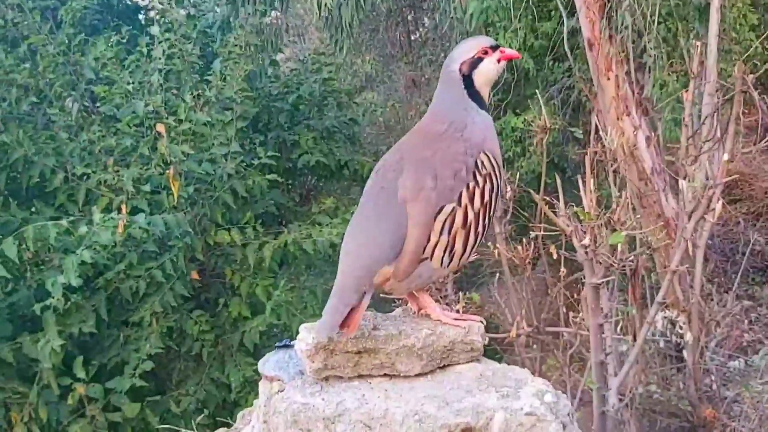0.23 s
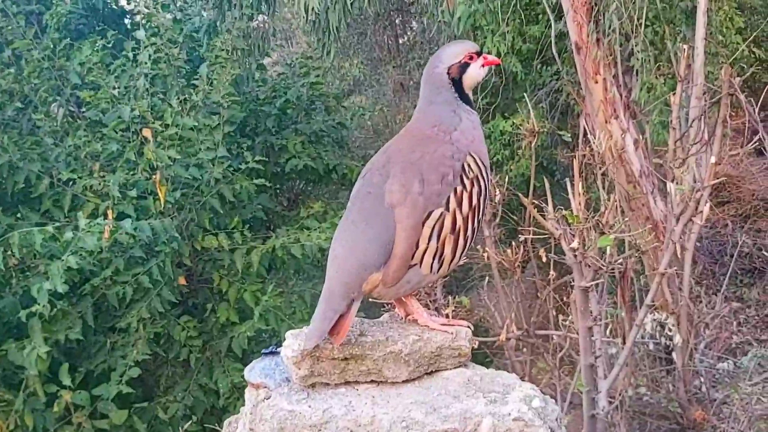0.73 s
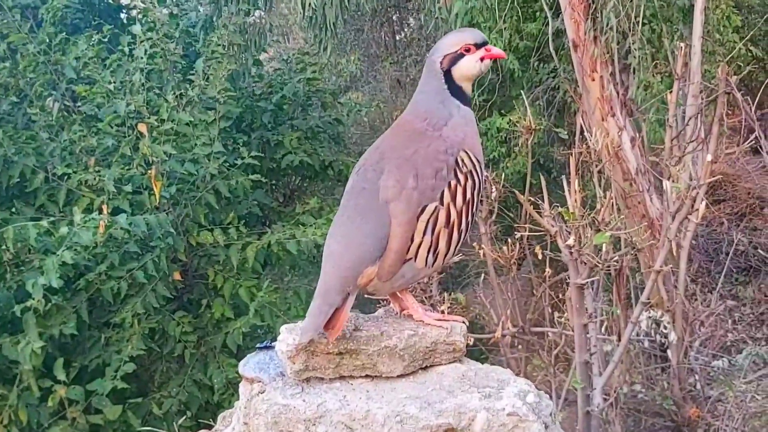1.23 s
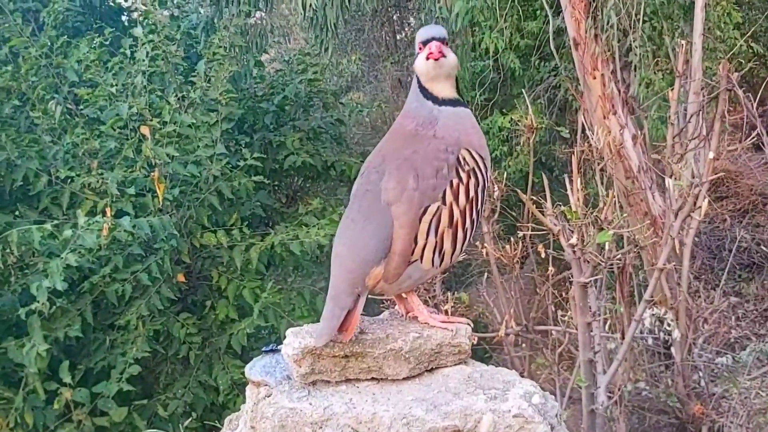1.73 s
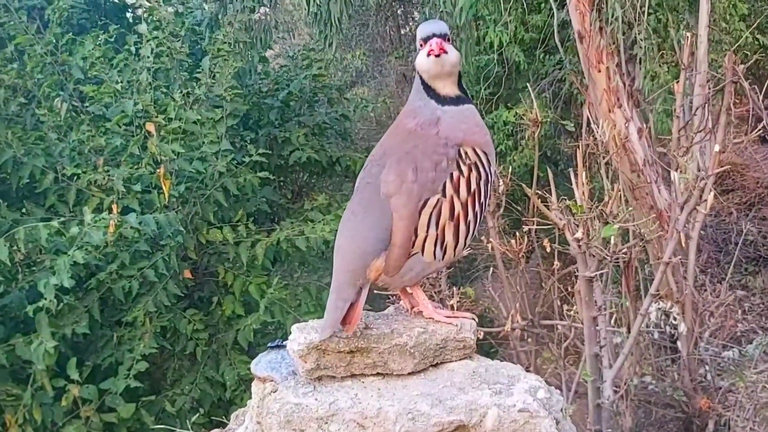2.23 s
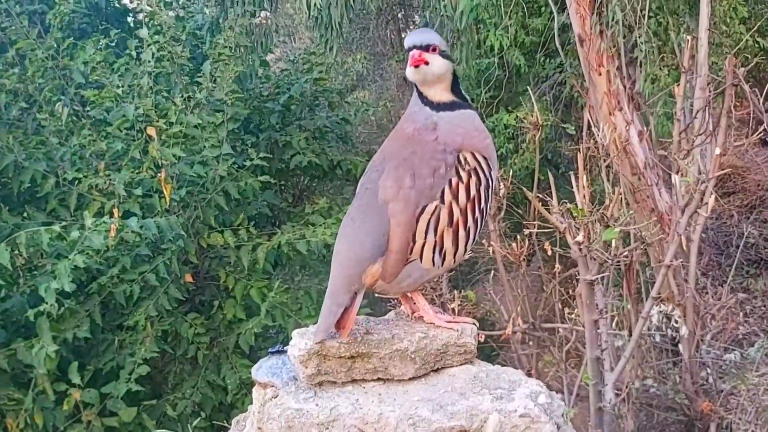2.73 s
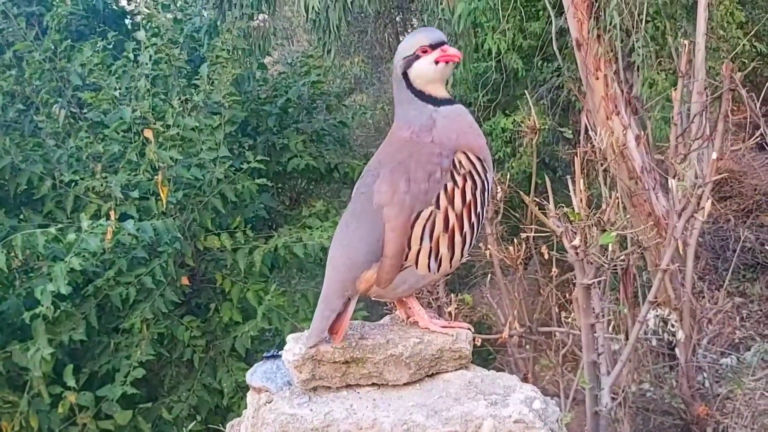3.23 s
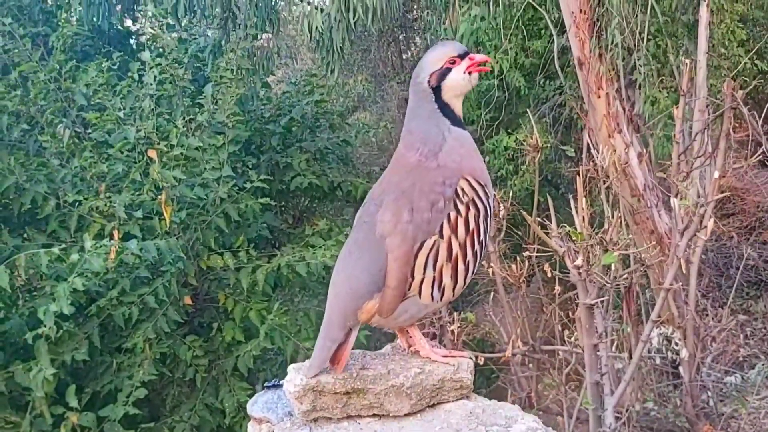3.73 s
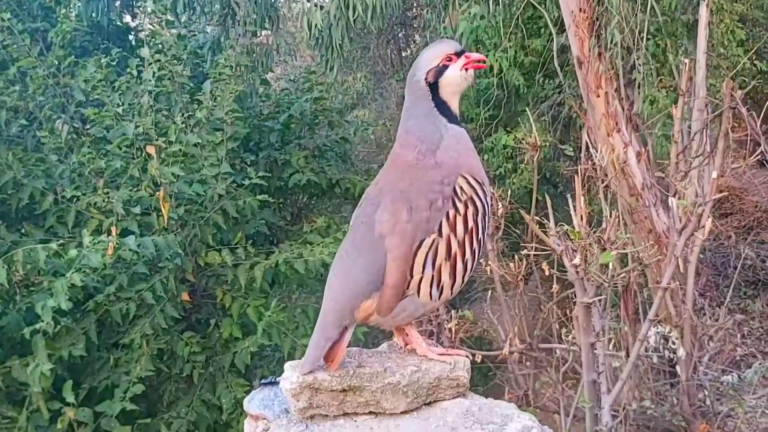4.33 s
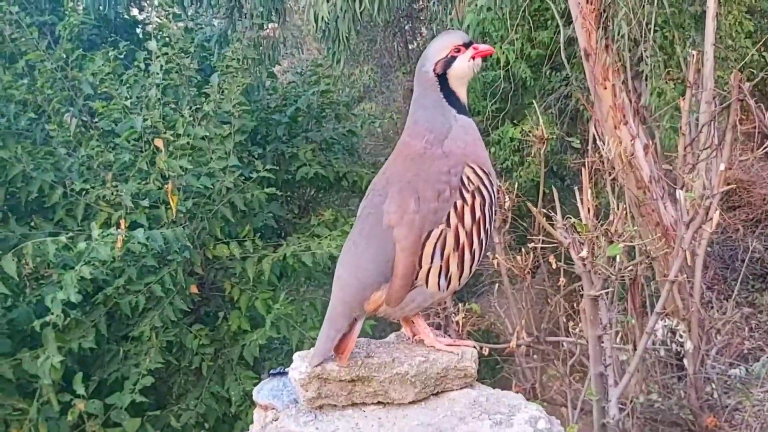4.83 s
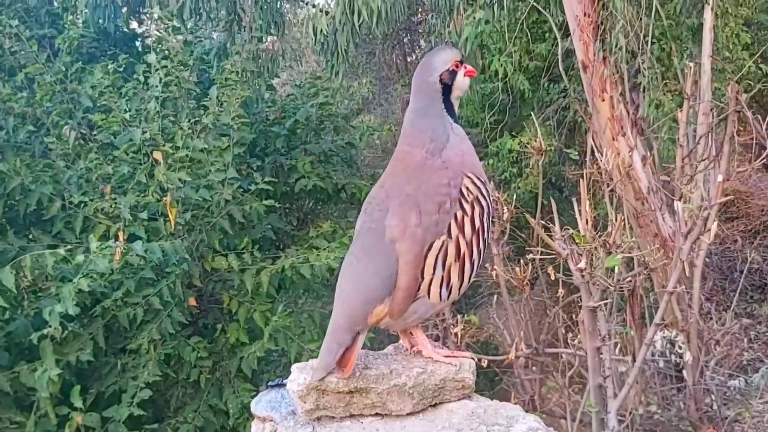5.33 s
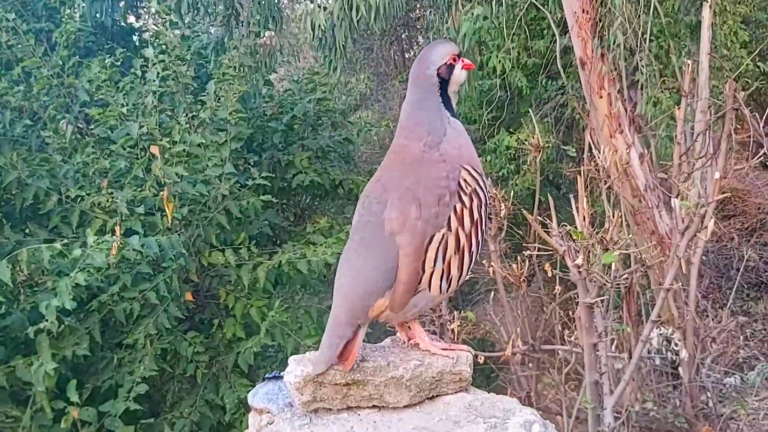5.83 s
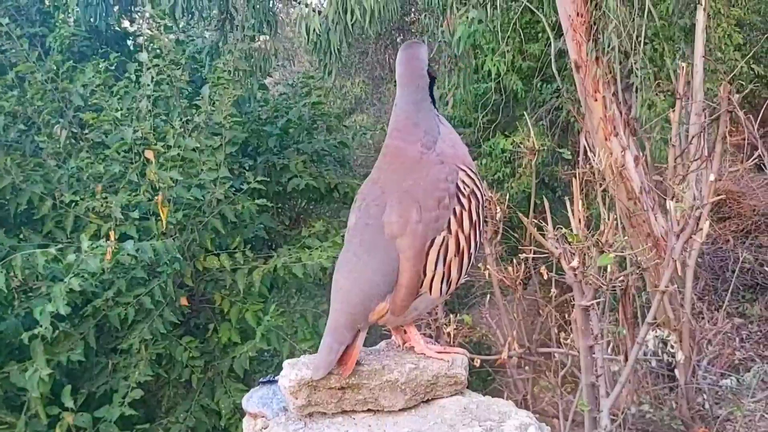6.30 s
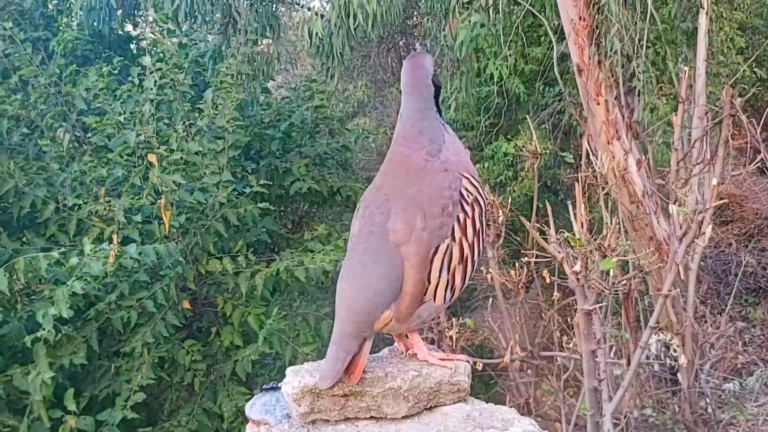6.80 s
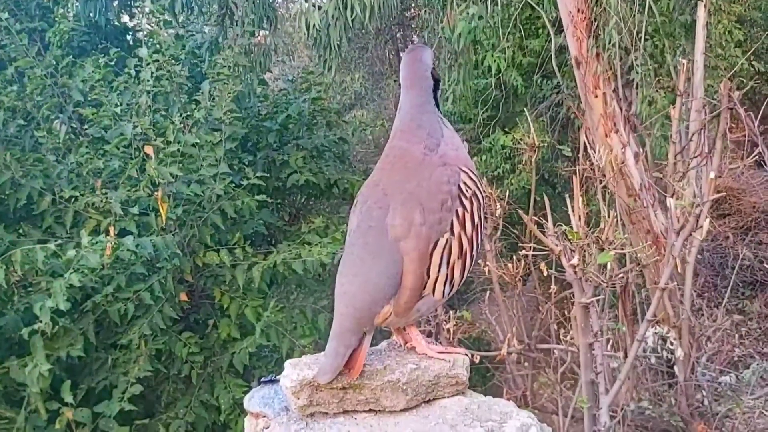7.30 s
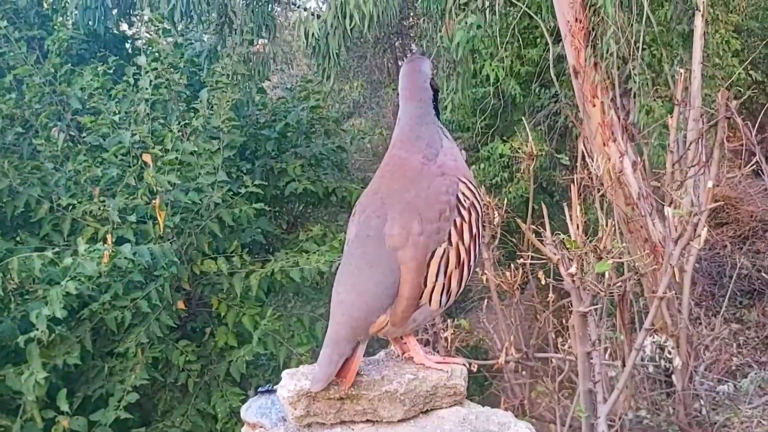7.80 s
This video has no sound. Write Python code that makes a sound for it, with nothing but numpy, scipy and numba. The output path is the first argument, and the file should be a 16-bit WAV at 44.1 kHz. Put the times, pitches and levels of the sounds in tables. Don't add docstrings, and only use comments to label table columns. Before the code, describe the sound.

Outdoors among bushes, a phone close to a game bird catches its hoarse cackling. Spaced, clipped clucks come first, then strong nasal chuks and shorter notes pack together, louder and more urgent, in rolling groups of three. Slight leafy echo follows each note. A far rival and other birds answer very faintly. The call cuts off near the end, leaving soft air and a low bump.

```python
import sys
import numpy as np
from scipy import signal
from scipy.io import wavfile
from scipy.ndimage import uniform_filter1d, minimum_filter1d
from numba import njit

SR = 44100
rng = np.random.default_rng(int(sys.argv[2]) if len(sys.argv) > 2 else 0)


def volts(x):
    e = np.asarray(x, float) / 20
    return 10 ** e


def to_wav(s):
    ch = np.atleast_2d(s).T
    pcm = np.round(np.clip(ch, -1, 1) * 32767)
    wavfile.write(sys.argv[1], SR, pcm.astype(np.int16))


N = 355181

# start in seconds, time to the peak in seconds,
# length in seconds, peak effort in dB, first pitch in Hz.
CLUCKS = [(.201, 0.043, 0.047, -11, 291), (.573, 0.024, 0.054, -16, 293.7),
          (.972, 0.024, 0.057, -15, 523.8), (1.358, 0.044, .044, -5.5, 334.3),
          (1.714, 0.015, 0.052, -15.5, 370)]
TICKS = [(.307, .02, 0.057, -26.5, 456), (.673, .007, 0.023, -15.5, 459), (1.071, 0.013, 0.032, -21, 458.6),
         (1.449, 0.018, 0.042, -22, 486.4), (1.809, .011, 0.036, -18.5, 448.2)]
GRUNTS = [(.693, 0.006, 0.048, -24, 452.4), (1.095, 0.0057, 0.052, -23, 426.8),
          (1.479, 0.0066, 0.048, -19.5, 470.4), (1.832, 0.017, 0.035, -20, 396)]
CHUKS = [(2.04, .017, 0.096, -8.5, 584.3), (2.263, 0.04646, 0.082, -9, 588.7),
         (2.99, 0.02, 0.095, -5.5, 594.3), (4.389, 0.05015, .073, -4, 562),
         (4.809, 0.0328, 0.086, -3.5, 590.7), (5.254, 0.0527, .086, -4, 623.6),
         (5.7, 0.0489, 0.077, -4.5, 605.3), (6.142, .027, .081, -1, 648.7),
         (6.591, 0.03175, 0.09, -3.5, 633), (7.087, 0.051, .082, -5, 669.8)]
PIPS = [(2.463, 0.024, 0.056, -9.5, 496.3), (2.861, 0.019, 0.057, -9.5, 471.1),
        (3.19, 0.022, 0.06, -9, 515), (3.6, 0.022, .051, -5.5, 479.6), (3.981, .016, 0.059, -7, 396.4)]
KAS = [(2.608, 0.015, 0.052, -7.5, 323.4), (3.336, 0.025, 0.05, -17, 378.6),
       (3.736, 0.027, 0.084, -7.5, 347.3), (4.117, 0.024, .058, -9.5, 412.6),
       (4.548, 0.028, 0.07, -7, 398.5), (4.977, 0.023, 0.074, -7.5, 479), (5.424, 0.022, 0.061, -8, 390.5),
       (5.867, 0.026, .06, -8.5, 395.1), (6.31, .021, 0.065, -7.5, 408.9),
       (6.773, 0.015, 0.058, -8.5, 391.4), (7.259, 0.0326, 0.057, -11, 387.5)]
RAS = [(2.694, 0.026, 0.045, -11.5, 448.4), (3.429, 0.052, 0.067, -9.5, 591),
       (3.801, .047, .07, -6.5, 599.2), (4.212, .038, 0.072, -6, 569), (4.629, 0.0392, 0.071, -4.5, 529.4),
       (5.076, 0.042, 0.069, -5.5, 523.3), (5.518, 0.047, 0.074, -5, 586.1),
       (5.961, 0.0415, .072, -4, 594.7), (6.406, 0.0485, .08, -4, 619.7), (6.873, 0.0657, .097, -5, 573.7),
       (7.354, 0.04262, 0.072, -7, 560.7)]


@njit
def band(x, hz, width):
    y, b, l = np.empty(len(x)), 0., 0.
    for i in range(len(x)):
        g, k = np.tan(np.pi * hz[i] / SR), width / hz[i]
        v = (b + g * (x[i] - l)) / (1 + g * (g + k))
        b, l, y[i] = 2 * v - b, l + 2 * g * v, k * v
    return y


def svf(x, hz, width):
    return band(x, hz + np.zeros(len(x)), 1. * width)


def ring(x, hz, width):
    return svf(svf(x, hz, 1.5 * width), hz, 1.5 * width)


def steady(x, seconds):
    k = int(seconds * SR)
    return x / np.sqrt(uniform_filter1d(uniform_filter1d(x ** 2, k), k) + 1e-18)


def pan(x, db):
    return x * volts(np.array([[db / 2], [-db / 2]]))


def partridge():
    # its notes, then climb to the peak in dB/s, sag after it in dB/s,
    # throb in dB, last pitch in Hz, throat shift in Hz, throat glide in Hz, beak in dB, gulp in dB.
    kinds = [(CLUCKS, (352, 401, 0.5, 330, -15.5, -44.5, -25.5, -41)),
             (TICKS, (110, 507.5, -22, 370, 45, -100, -38, -33.5)),
             (GRUNTS, (93, 399.5, 3.5, 259.5, 6, -100, -42, -27.5)),
             (CHUKS, (61.5, 147, 5.5, 270, 34.5, 3, -32, -23)),
             (PIPS, (297.5, 448, 1.5, 250, 34.5, -150, -31.5, -24)),
             (KAS, (205.5, 328, -0.5, 300, -49.5, -200, -31, -33)),
             (RAS, (270.5, 403.5, 3.5, 265, -29, 254, -31.5, -22))]
    # time in seconds, beak gape from 0 to 1,
    # dB added at the top of the spectrum (negative while the head points away).
    head = [(0, 0.1, -13), (1.699, 0.01, 3), (2.1, 0.42, -1), (3.401, 0.48, -0.5), (4.002, 1, 4.5),
            (6.101, 0.93, -2), (6.399, 0.99, -9)]
    # time in seconds, roughness from 0 to 1 of a note of middle brightness.
    hoarseness = [(0, .5), (1.9, .45), (2.05, .5), (2.4, .22), (2.8, .15), (3, .4), (3.25, .2), (3.6, .4),
                  (4.3, .5), (8, .55)]

    t = np.arange(N) / SR
    notes = np.array(sorted(row + shape for rows, shape in kinds for row in rows), float)
    note = np.clip(np.searchsorted(notes[:, 0], t) - 1, 0, None)
    (start, rise, length, peak_db, first_hz, climb, sag, throb_db,
     last_hz, shift_hz, glide_hz, beak_db, gulp_db) = notes[note].T
    since, left = t - start, length - (t - start)
    along = np.clip(since / length, 0, 1.02)
    pitch = first_hz + (last_hz - first_hz) * along
    vary = rng.standard_normal(len(notes))[note]

    s, *posture = np.transpose(head)
    gape, away_db = (np.interp(t, s, c) for c in posture)
    throat_hz = 880 + 370 * np.sqrt(np.abs(gape)) + shift_hz + glide_hz * (along - .5)
    beak_db = beak_db + 9.5 * gape
    gulp_db = gulp_db - 6.5 * gape

    rough = np.interp(t, *np.transpose(hoarseness)) + np.clip(.02 * (beak_db + 33), -.2, .2)
    spread = np.array([.17 * rough ** 2, .55 * rough])
    pulses, phase = syrinx(pitch, spread, rng.standard_normal((N // 40, 2)))
    source = pulses + .09 * rough * np.exp(-phase / .5) * rng.standard_normal(N)
    rasp = source + .18 * rough * rng.standard_normal(N)

    late = since - rise
    throb = 1 - np.cos(2 * np.pi * 41.3 * late)
    held_db = peak_db + np.minimum(climb * late, -sag * late)
    held_db = held_db - throb_db * rough * np.sqrt(np.abs(gape)) * throb
    attack_s, attack_db, release_s, release_db = .011, 46, .014, 34
    edge_db = attack_db * np.maximum(1 - since / attack_s, 0)
    edge_db = edge_db + release_db * np.maximum(1 - left / release_s, 0)
    effort = volts(held_db - edge_db) * (since < length) + 1e-9
    effort = uniform_filter1d(uniform_filter1d(effort, size=50), size=50)
    flow = uniform_filter1d(effort ** .75, size=150)
    flow = flow * volts(-9 * np.clip(1 - left / .021, 0, 1))

    beak_gain = flow * uniform_filter1d(volts(beak_db - 5.5), size=200)
    out = throat(source, throat_hz, gape, effort) + beak_gain * beak(rasp, rough, gape, away_db, vary)
    crop = volts(-30) * effort * steady(ring(rasp, 560, 260), .012)
    out = out + pan(gulp(source, pitch, gulp_db, since, left) + crop, -1.8)
    return side_branches(out + chest(flow))


@njit
def syrinx(hz, spread, chance):
    pulses, phase, p, k = np.zeros(len(hz) + 1), np.empty(len(hz)), 0., 0
    for i in range(len(hz)):
        step = hz[i] * np.exp(spread[0, i] * chance[k, 0]) / SR
        p += step
        if p >= 1:
            p, k = p - 1, k + 1
            size = np.exp(spread[1, i] * chance[k, 1])
            pulses[i] += size * p / step
            pulses[i + 1] += size * (1 - p / step)
        phase[i] = p
    return pulses[:-1], phase


def throat(source, throat_hz, gape, effort):
    # centre in Hz, width in Hz, level in dB, dB added at full gape.
    windpipe = [(920, 280, -12, -2), (1500, 240, -3, -16)]
    out = ring(source, throat_hz, 180)
    for hz, width, db, gape_db in windpipe:
        out = out + volts(db + gape_db * gape) * ring(source, hz, width)
    passband = signal.butter(4, (770, 1600), "band", fs=SR, output="sos")
    out = effort * steady(signal.sosfilt(passband, out), .004)
    return out + volts(-18) * np.roll(out, 9) * np.array([[-1], [1]])


def beak(rasp, rough, gape, away_db, vary):
    # centre in Hz, width in Hz, level in dB, dB added at full gape,
    # left minus right in dB, lag of the right in samples.
    rings = [(1997, 490, -1, -3.5, -2, 0.5), (2211, 171, 4, -11.5, 7, 3.8), (3603, 500, -6.5, 2, -5, 3),
             (5427, 790, 6, -23, -1.5, 16.5), (6950, 600, -28, 11.5, 12.5, 5),
             (10410, 1600, -15.5, -3, 4, 11.5), (11570, 3800, -19, -5.5, 3, 3.5),
             (14200, 1400, -24, -8, 8.5, 1.4)]
    moving = (4800 - 450 * gape + 90 * vary, 350, 2, 0, -5, -1)
    out, hiss = 0, rng.standard_normal((2, N))
    for hz, width, db, gape_db, pan_db, lag in rings + [moving]:
        top = np.mean(hz) / 1e4
        ports = np.array([rasp, np.roll(rasp, int(lag))]) + .1 * top ** 2 * hiss
        shine = np.array([steady(svf(ring(p, hz, width), hz, 2 * width), .039) for p in ports])
        level_db = db + gape_db * gape + min(top, 1) ** 2 * away_db + 3.8 * top * vary
        out = out + volts(level_db) * pan(shine, pan_db)
    return out


def gulp(source, pitch, gulp_db, since, left):
    left = left - .021
    swell_db = gulp_db - 750 * np.maximum(left, 0) + 1900 * np.minimum(left, 0)
    tone = steady(ring(source, np.minimum(pitch, 470), 210), .014)
    onset = np.clip(since / .0016, 0, 1)
    return tone * uniform_filter1d(volts(swell_db) * onset, size=300)


def chest(flow):
    mid, side = rng.standard_normal((2, N))
    rumble = [steady(ring(mid + .46 * h, 80, 120), .12) for h in (side, -side)]
    return pan(volts(-57.5) * flow * np.array(rumble), 1.5)


def side_branches(voice):
    # centre in Hz, width in Hz, share swallowed.
    valleys = [(1723, 740, 0.88), (2902, 27, 0.48), (5370, 1200, 0.96), (8200, 770, 0.87)]
    for hz, width, share in valleys:
        voice = np.array([ch - share * svf(ch, hz, width) for ch in voice])
    return voice


def surroundings(bird, t60=.63, bush_db=-31, rock_db=-35, rock_s=.06):
    t = np.arange(int(.5 * SR)) / SR
    bushes = volts(bush_db - 60 * t / t60) * np.clip(t / .006, 0, 1)
    rocks = volts(rock_db) * np.exp(-((t - rock_s) / .015) ** 2)
    mid, side = rng.standard_normal((2, len(t)))
    side = side - .7 * svf(side, 900, 1800)
    tails = (bushes + rocks) * np.array([mid + .8 * side, mid - .8 * side]) / np.sqrt(.03 * SR)
    tails = tails + volts(-42 - 60 * t / .25) * np.diff(rng.standard_normal((2, len(t) + 1)))
    voice = bird.mean(axis=0)
    voice = voice - .5 * svf(voice, 1250, 500)
    return signal.fftconvolve(voice[None], tails, axes=1)[:, :N]


def rival():
    # start in seconds, end in seconds,
    # throat ring in Hz, level in dB.
    far_clucks = [(3.165, 3.2, 1260, -50), (3.3, 3.34, 1280, -53), (7.635, 7.71, 1200, -61),
                  (7.805, 7.855, 1280, -61), (7.94, 8.0, 1290, -62)]
    t, noise, out = np.arange(N) / SR, rng.standard_normal(N), np.zeros(N)
    far_beak = volts(-12) * steady(ring(noise, 3870, 160), .05)
    for t0, t1, hz, db in far_clucks:
        swell = np.sin(np.pi * np.clip((t - t0) / (t1 - t0), 0, 1))
        out += volts(db) * swell * (steady(ring(noise, hz, 170), .05) + far_beak)
    return out


def neighbours():
    # start in seconds, end in seconds, first pitch in Hz, last pitch in Hz, level in dB.
    far_calls = [(-.02, .13, 285, 268, -56), (.747, .979, 750, 798, -62), (.764, .92, 1810, 1840, -76),
                 (1.278, 1.38, 345, 340, -67), (1.877, 2.15, 218, 200, -66), (1.927, 2.076, 370, 390, -60),
                 (1.87, 1.931, 820, 814, -52), (2.35, 2.564, 212, 213, -70),
                 (3.066, 3.139, 2000, 1960, -63), (3.5, 3.6, 2170, 2150, -67),
                 (3.895, 3.985, 2010, 2000, -59), (5.8, 5.862, 2100, 2240, -58),
                 (3.92, 3.97, 3830, 3850, -69), (4.075, 4.12, 3920, 3850, -63),
                 (3.53, 3.6, 1760, 1750, -71)]
    t, out = np.arange(N) / SR, np.zeros(N)
    wobble = steady(svf(rng.standard_normal(N), 25, 40), .3)
    for t0, t1, hz0, hz1, db in far_calls:
        u = np.clip((t - t0) / (t1 - t0), 0, 1)
        hz = hz0 + (hz1 - hz0) * u + 4.8 * wobble
        tone = np.sin(2 * np.pi * np.cumsum(hz) / SR)
        out += volts(db + 3 * np.roll(wobble, 900)) * np.sin(np.pi * u) ** .5 * tone
    return out


def small_noises():
    # start in seconds, length in seconds, centre in Hz, width in Hz, level in dB,
    # left minus right in dB.
    bumps = [(-.02, 0.16, 1090, 880, -47.5, -6), (0.17, 0.0033, 11800, 9070, -48, 11),
             (0.307, 0.0033, 10700, 8900, -50, 10), (0.438, 0.031, 1750, 500, -51.5, 8),
             (.508, 0.047, 1500, 704, -46, 5), (0.627, 0.039, 116, 117, -51, 28),
             (1.507, 0.035, 113, 120, -46, 22), (5.192, 0.0056, 14500, 2800, -53.5, -18),
             (7.451, .1, 480, 349, -35, 3.5), (7.46, 0.08, 1400, 818, -51.5, -20)]
    t, noise, out = np.arange(N) / SR, rng.standard_normal(N), np.zeros((2, N))
    for t0, length, hz, width, db, pan_db in bumps:
        u = np.maximum(t - t0, 0) / length
        fade = np.clip(8 * u, 0, 1) * np.exp(-2.5 * u)
        grain = steady(ring(ring(noise, hz, width), hz, width), .2)
        out += pan(volts(db) * fade * grain, pan_db)
    return out


def air():
    # frequency in Hz, level in dB per Hz.
    colour = [(30, -23.5), (120, -16), (400, -8), (900, -19.5), (2000, -27), (6000, -32), (15500, -47)]
    out, (hz, db) = 0, np.transpose(colour)
    for f in 35 * 2 ** np.arange(0, 8.9, .5):
        mid, side, drift = rng.standard_normal((3, N))
        drift_db = 1.4 * steady(svf(drift, 2.9, 5), 1.5)
        gain = volts(np.interp(np.log(f), np.log(hz), db) + drift_db)
        mid, side = (ring(v, f, f / 3) for v in (mid, side))
        out = out + gain * (mid + .7 * side * np.array([[1], [-1]]))
    return volts(-69) * out / np.sqrt(np.mean(out ** 2))


def scene():
    bird = partridge()
    return bird + surroundings(bird) + rival() + neighbours() + small_noises() + air()


def top_cut(x):
    return signal.sosfilt(signal.butter(12, 16480, fs=SR, output="sos"), x)


def record(dry):
    high = signal.butter(4, 9300, "high", fs=SR, output="sos")
    hiss = volts(-77) * signal.sosfilt(high, rng.standard_normal((2, N)))
    sound = np.array([ch - svf(ch, 8400, 670) for ch in dry + hiss])
    sound = signal.sosfilt(signal.ellip(8, .3, 60, 15700, fs=SR, output="sos"), sound)
    room = np.minimum(.97 / (np.abs(sound).max(axis=0) + 1e-9), 1)
    gain = uniform_filter1d(minimum_filter1d(room, size=200), size=200)
    return top_cut(sound * gain)


dry = scene()
out = record(dry)
to_wav(out)
```